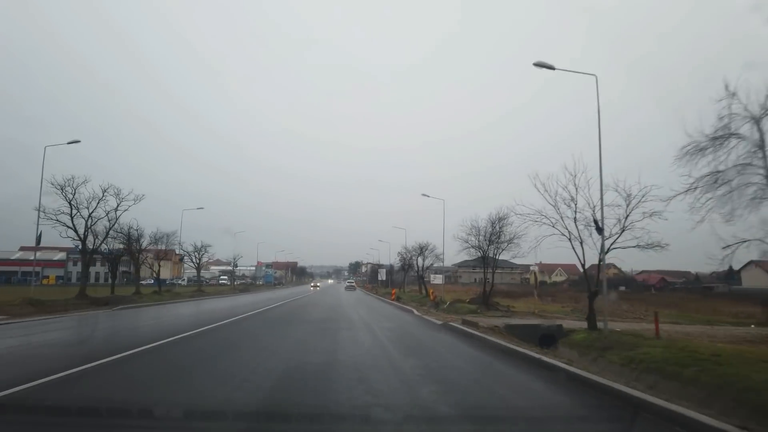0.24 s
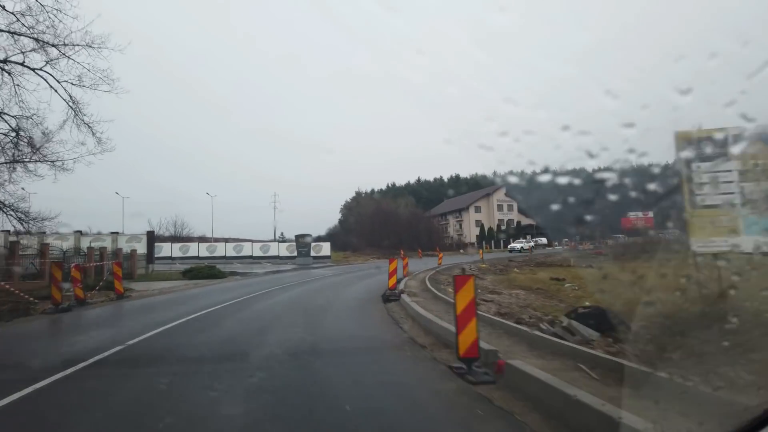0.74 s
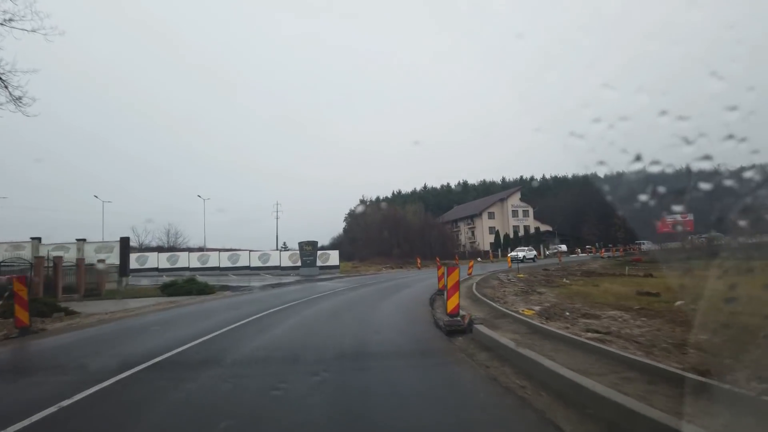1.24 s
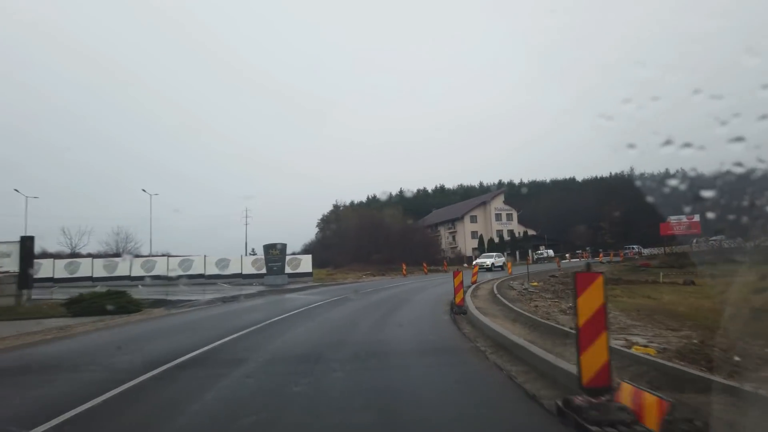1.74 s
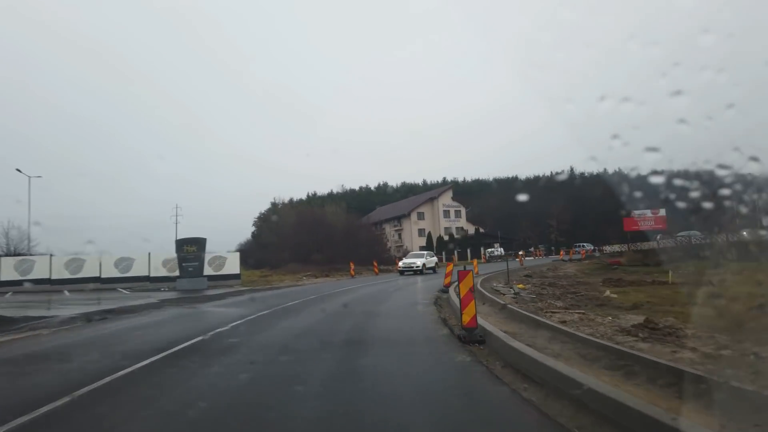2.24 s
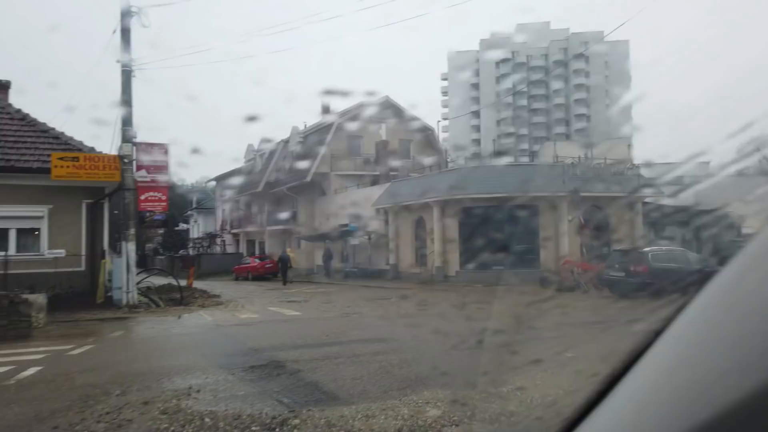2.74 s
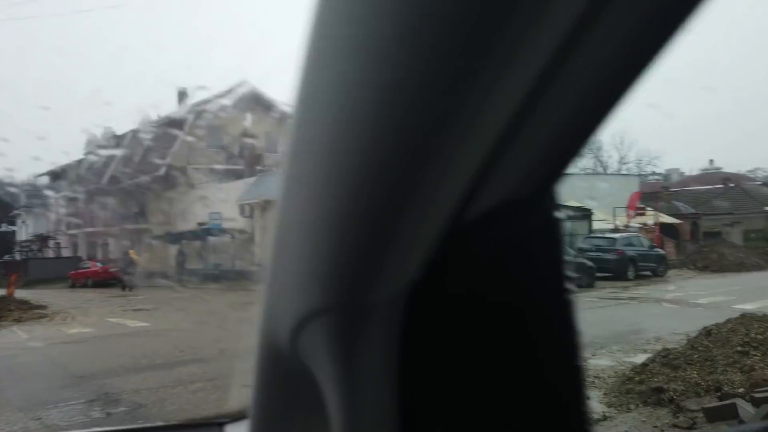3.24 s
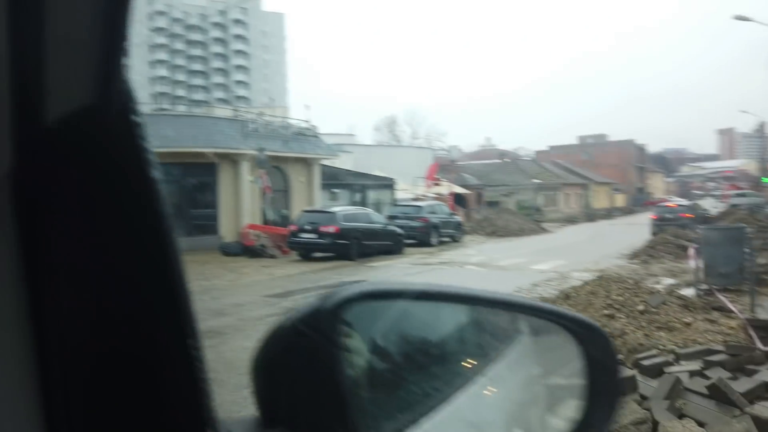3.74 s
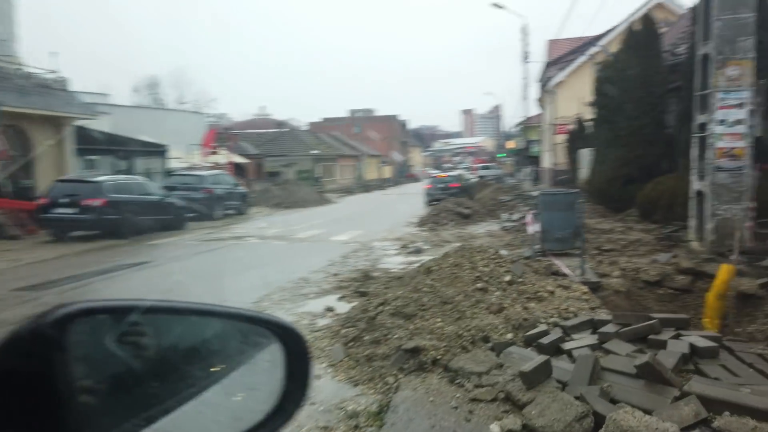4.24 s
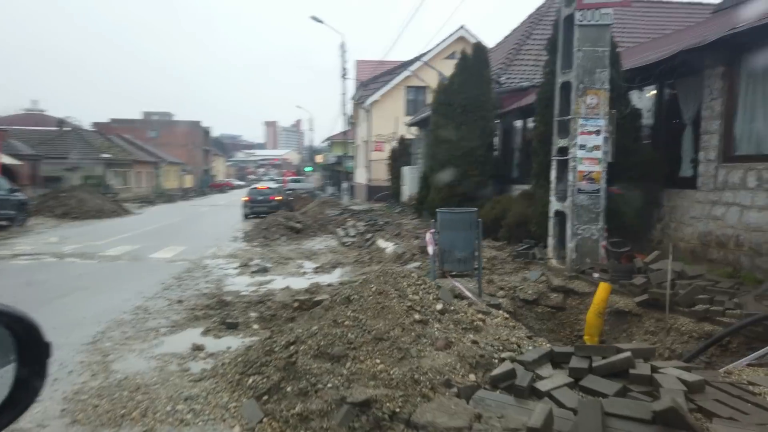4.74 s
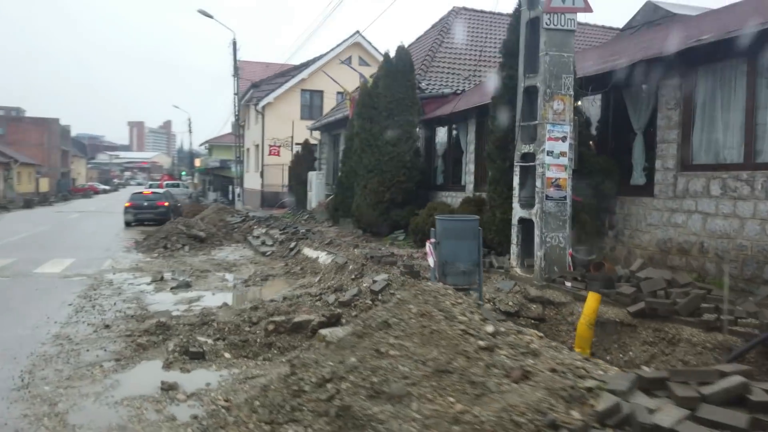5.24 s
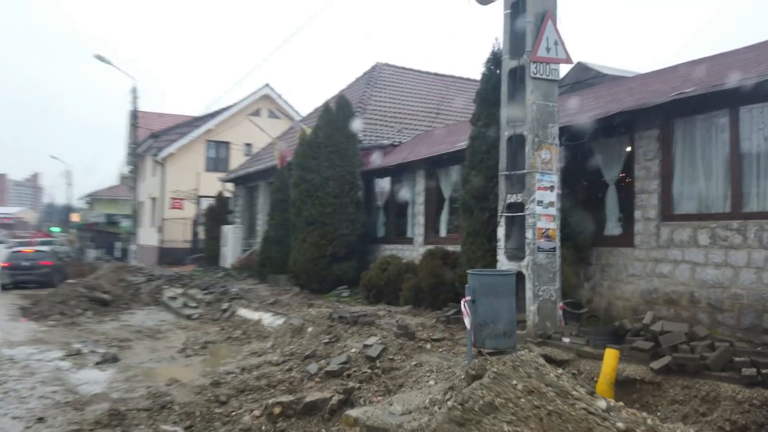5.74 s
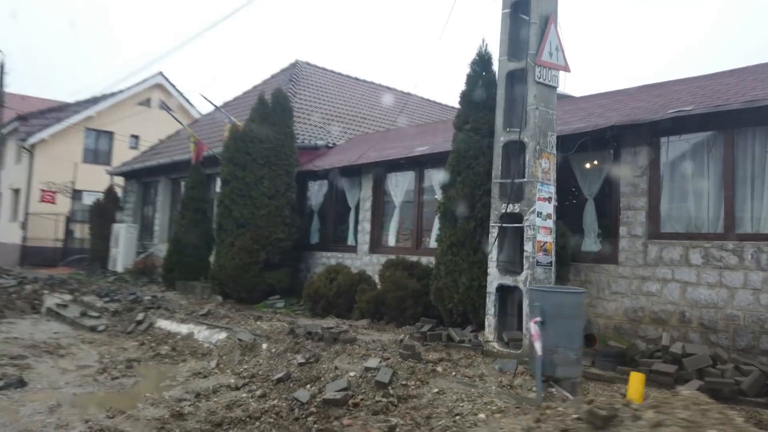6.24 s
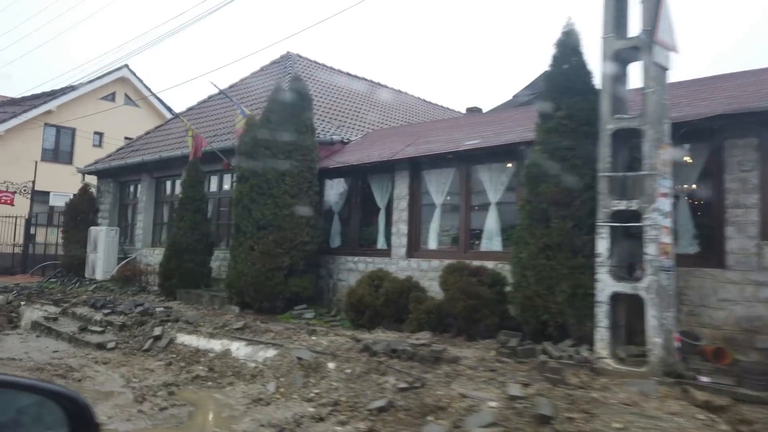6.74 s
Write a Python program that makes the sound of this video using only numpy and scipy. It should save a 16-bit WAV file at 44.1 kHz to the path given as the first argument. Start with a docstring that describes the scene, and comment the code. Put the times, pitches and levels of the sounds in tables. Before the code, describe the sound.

Close stereo microphones sit inside a car on a wet road; bass dominates. From 0 to 0.4 s the car runs fast: a deep steady engine tone, booming cabin air, tyre roar and soft spray, with a couple of faint ticks. A click at 0.38 s marks an abrupt cut to slower, softer rolling with a faint wavering tyre hum; a small metal buckle jingles near 1.15 s, followed by a light thud at 1.3 s. At 2.8 s another cut drops the engine near idle. The car crawls over broken ground, swelling with low jolts at 3.1, 4.1, 4.4 and 5.4 s. Cloth rustles, trim ticks cluster from 3.2 s, and a tiny gritty squeak slides around 4.1-4.3 s. A low thump comes at 5.15 s, a bright hard clack at 5.39 s, then the heaviest thuds at 5.6-5.8 s. The engine fades under subdued rumble, with last ticks near 6.5 s, until 7 s.

```python
"""The bass of a car's cabin on a wet road leads: engine firing tone, body bounce, air boom and floor drumming.
Three stretches follow abruptly: fast, slowing, then crawling over broken ground. The bass is sines and
shaped noise; thuds are decaying panel modes; tyre roar, spray and rubbing cloth are coloured noise.
Tyre air sings in two narrow tones; trim ticks, a buckle and a clack are struck resonances filled with
grainy noise; a squeak slides. All is heard at two close microphone ports."""
import sys
import numpy as np
from scipy import signal
from scipy.fft import rfft, irfft, next_fast_len
from scipy.io import wavfile
from scipy.ndimage import uniform_filter1d, map_coordinates

SR = 44100
rng = np.random.default_rng(int(sys.argv[2]) if len(sys.argv) > 2 else 0)


def inscribe(sig):
    """Save sig as 16-bit PCM at rate SR to the path in sys.argv[1].

    A 1-D sig is mono; a 2-D sig holds one channel per row.
    Samples are clipped to [-1, 1] before scaling.
    """
    pcm = np.round(np.clip(np.atleast_2d(sig).T, -1, 1) * 32767)
    wavfile.write(sys.argv[1], SR, pcm.astype(np.int16))


N = 308700

# Joins between the three stretches of the drive: time [s]
SPLICE_S = [.3818, 2.815]
# Excitation by the road: (time [s], tyre roar [dB], spray [dB], floor pan drumming [dB])
ROAD = [(0.0, -38, -48.5, -42), (0.19, -34.5, -50, -31), (0.375, -38, -50, -32), (0.39, -42.5, -55, -35),
        (1.0, -41.5, -55, -37), (1.74, -40.5, -54.5, -38), (2.3, -41.5, -55.5, -36),
        (2.81, -39, -54.5, -44), (2.82, -45.5, -56.5, -36.5), (3.03, -44.5, -55.5, -38.5),
        (3.12, -47, -57, -44.5), (3.76, -47, -58, -41), (4.03, -46, -56.5, -42),
        (4.42, -44.5, -51.5, -38.5), (4.85, -48, -57, -40), (5.5, -46, -57.5, -36.5), (5.8, -38, -57, -42),
        (5.97, -44.5, -55.5, -40.5), (6.21, -49.5, -60, -38), (6.55, -44, -57.5, -35),
        (7.0, -45.5, -57, -41)]
# Likeness of the two ports for local sources: (frequency [Hz], coherence [-1 to 1])
PORT_LIKENESS = [(30, 1), (80, 1), (150, 1), (300, 0.93), (450, 1), (700, 0.91), (1200, 0.92), (2500, 0.29),
                 (6000, 0.88), (14000, 0.56)]


def engine():
    """Periodic firing gives a near-sinusoidal tone; rocking on the mounts adds to its amplitude at bumps."""
    # In gear, then near idle: (time [s], firing frequency [Hz], level [dB])
    firing = [(0, 47.3, -21), (.375, 48.5, -15), (.39, 43.84, -27), (1.28, 42.8, -23.5), (1.36, 43, -31),
              (2.13, 41.34, -21), (2.5, 41.2, -29), (2.81, 42.18, -21.5), (2.82, 29.56, -33.5),
              (4.8, 28.19, -31), (5.5, 30.08, -27.5), (5.85, 33.7, -26), (6.46, 30.57, -42),
              (6.64, 28.5, -46), (7.0, 29.3, -52)]
    hz, db = curves(firing)
    rocking = bumps()[2]
    return tone(hz, amp(db) + rocking, waver_hz=0.446)


def body_bounce():
    """The sprung body oscillates at its low resonance, and bumps add amplitude."""
    hz, db = stretches()[:2]
    bounce = bumps()[0]
    return tone(hz, amp(db + 2.2 * wobble(0.67)) + bounce, waver_hz=1.186)


def cabin_boom():
    """The enclosed cabin air resonates as narrow-band bass noise, driven harder at bumps."""
    # Boom spectrum: (frequency [Hz], relative level [dB per Hz])
    boom_spectrum = [(8, -29.5), (13, -4.5), (28, -3), (36, 5), (52, 0.5), (62, -40.5)]
    steady_db, boom = stretches()[2], bumps()[1]
    return (amp(steady_db) + boom) * drone(boom_spectrum)


def floor_pan():
    """Broadband road forcing drums the floor plate in two resonant bands and a narrow hum."""
    # Low drum spectrum: (frequency [Hz], relative level [dB per Hz])
    drum_low = [(45, -28), (56, -9), (72, -8), (85, -29)]
    # High drum spectrum: (frequency [Hz], relative level [dB per Hz])
    drum_high = [(44, -29), (75, -1), (87, 1), (102, -4), (121, 1), (150, -9.5), (200, -37), (330, -120)]
    # Narrow hum spectrum: (frequency [Hz], relative level [dB per Hz])
    hum_spectrum = [(70, -49.5), (84, -6.5), (92, -5), (102, 0), (112, -13.5), (140, -60)]
    # Hum strength before its random wobble: (time [s], level [dB])
    hum_level = [(0, -61), (.45, -33.5), (1.3, -39.5), (2.3, -41), (3.0, -36), (3.7, -35), (4.0, -47),
                 (4.3, -38.5), (4.7, -48), (7, -41)]
    low = amp(-5) * drone(drum_low)
    high = amp(1.2 * wobble(5)) * drone(drum_high)
    hum = amp(curves(hum_level)[0] + 1.7 * wobble(3.2)) * drone(hum_spectrum)
    return amp(curves(ROAD)[2]) * (low + high) + hum


def thuds():
    """A soft blow excites by modal coupling: modes nearest its push ring most, then decay exponentially."""
    # Suspension blows: (time [s], level before mode weights [dB], strongest push [Hz],
    # loss an octave away [dB], share of the free ring time [1])
    thud_rows = [(1.308, -12.5, 93, 25.5, 0.65), (4.039, -30, 715, 3, 0.85), (4.404, -28.5, 403, 1.5, 1.04),
                 (4.814, -32.5, 442, 42, 0.8), (5.154, -12, 50.5, 14, 1.6), (5.168, -22, 138.2, 20, 1.63),
                 (5.6168, -15, 85, 10, 0.97), (5.6424, -13.5, 92.5, 12, 0.48),
                 (5.6974, -5, 144, 13.5, 0.31), (5.7058, -7, 187, 11.5, 0.28),
                 (5.727, -18.5, 330, 13.5, 0.79), (5.7364, -11.5, 130, 9, 0.17),
                 (5.783, -17, 432.8, 36, 0.75), (5.79, -24, 441, 31, 0.28)]
    # Floor and panel modes: (frequency [Hz], relative level [dB], free t60 [s])
    pan_modes = [(45.4, -2, 1), (86.9, 4.5, 0.28), (107.6, -6, 0.55), (160.3, 2.5, 0.12),
                 (244.7, 0.5, 0.13), (311, -13, 0.045), (429, -3, 0.079), (696, -6.5, 0.12),
                 (940, -13, 0.056)]
    sag, sag_s = 0.051, 0.015  # a struck panel starts sharp by this share and settles
    out, t = np.zeros((2, N + SR)), np.arange(SR // 2) / SR
    advance = sag * sag_s * (1 - np.exp(-t / sag_s))
    heard = t + advance - np.array([[1.3e-4], [0]])  # the left port hears it later
    fade = np.cos(np.pi * t) ** 2
    for s, db, push_hz, loss_db, lasts in thud_rows:
        for hz, mode_db, t60 in pan_modes:
            peak_db = db + mode_db - loss_db * abs(np.log2(hz / push_hz))
            decay = amp(peak_db - 60 * t / (lasts * t60))
            build = 1 - np.exp(-1.5 * hz * t)  # about one cycle
            out[:, round(s * SR):][:, :len(t)] -= decay * build * fade * np.sin(2 * np.pi * hz * heard)
    return out[:, :N]


def tyres():
    """Random tread and water impacts make broadband noise: roar through the floor, spray in the arches."""
    # Roar before the last stretch, with tyre cavity near 220 and 440 Hz:
    # (frequency [Hz], relative level [dB per Hz])
    roar_fast = [(82, -34), (140, -11.5), (157, 3), (189, -2.5), (226, 0.5), (269, -9.5), (307, -7.5),
                 (345, -13), (391, -13), (437, -9.5), (480, -11.5), (527, -23.5), (620, -34.5), (810, -64),
                 (1360, -120)]
    # Roar at a crawl: (frequency [Hz], relative level [dB per Hz])
    roar_slow = [(82, -47), (140, -5), (175, 1.5), (194, -4.5), (238, -4.5), (264, -7), (307, -4),
                 (339, -12), (471, -13), (505, -16.5), (620, -25.5), (810, -57), (1360, -120)]
    # Spray spectrum: (frequency [Hz], relative level [dB per Hz])
    spray_spectrum = [(340, -32.5), (580, -3.5), (696, -3), (857, -8.5), (963, -8), (1540, -14.5),
                      (1920, -12), (2270, -18.5), (3400, -24.5), (3780, -26), (5300, -32.5), (6780, -42.5),
                      (10200, -40.5), (13000, -64.5)]
    roar_db, spray_db = curves(ROAD)[:2]
    crawling = np.arange(N) / SR > SPLICE_S[1]
    slow = rush(roar_slow, patchy_db=1.0, lag_s=0.000054)
    fast = rush(roar_fast, patchy_db=1.5, lag_s=0.00011)
    spray = rush(spray_spectrum, patchy_db=1.18, lag_s=0.000067)
    texture = wobble(13)  # the road surface shakes both layers together
    roar = amp(roar_db + 0.51 * texture) * np.where(crawling, slow, fast)
    return roar + amp(spray_db + 0.16 * texture) * spray


def cavity():
    """Air resonance in the tyres gives two narrow, fluttering tones an octave apart."""
    # Tones before flutter: (time [s], frequency [Hz], level [dB], octave level [dB])
    cavity_tones = [(0, 226.1, -48.5, -51.5), (.375, 224.8, -46, -54), (.39, 217.5, -52.5, -69),
                    (1.1, 223, -54.5, -58), (1.6, 217.4, -49, -49.5), (1.92, 232.3, -53.5, -56.5),
                    (2.25, 211.6, -48.5, -61), (2.81, 220.6, -53, -55.5), (2.82, 221.6, -80, -78)]
    hz, low_db, high_db = curves(cavity_tones)

    def flutter(apart):
        return wobble(14) + apart * np.array([[1], [-1]]) * wobble(14)  # slightly unlike at the ports

    low = tone(hz, amp(low_db), waver_hz=3) * flutter(.08)
    return low + tone(2 * hz, amp(high_db), waver_hz=6) * flutter(.17)


def clothes():
    """Friction of cloth is modulated noise: strokes rise, hold and fall, and treble fizz follows them."""
    # Cloth spectrum: (frequency [Hz], relative level [dB per Hz])
    cloth_spectrum = [(1650, -20.5), (2800, -2.5), (3480, -5), (4180, -6.5), (4630, -6.5), (5620, -5),
                      (6470, -10.5), (7500, -11.5), (9750, -20.5), (16500, -120)]
    # Treble fizz spectrum: (frequency [Hz], relative level [dB per Hz])
    fizz_spectrum = [(4000, -26), (6800, -5), (8090, 0.5), (10200, 0.5), (12100, -5.5), (15100, -7),
                     (15600, -14.5)]
    # Strokes: (start time [s], length [s], cloth level [dB], fizz level [dB])
    strokes = [(2.762, 0.29, -64, -71), (2.94, 0.66, -68, -75.5), (3.467, 0.61, -67, -77),
               (3.811, 0.47, -66, -76), (4.194, 0.68, -59.5, -65.5), (4.709, 0.5, -68.5, -72.5),
               (5.074, 0.33, -66.5, -71.5), (5.3, 0.45, -72.5, -73.5), (5.831, 0.17, -88, -50),
               (5.953, 0.18, -55, -77.5), (6.443, 0.31, -71, -99), (6.615, 0.42, -84, -78),
               (6.803, .4, -73, -76)]
    rise_s, fall_s, patchy_db = 0.093, 0.21, 1.3
    t = np.arange(N) / SR
    ramp = lambda x: np.clip(x, 0, 1) ** 2
    gains = amp(stretches()[3:])
    for s, length, *dbs in strokes:
        stroke = ramp((t - s) / rise_s) * ramp((s + length - t) / fall_s)
        gains = gains + amp(dbs)[:, None] * stroke
    cloth, fizz = gains
    grip = wobble(25)
    rubbing = cloth * amp(1.2 * grip) * rush(cloth_spectrum, patchy_db, lag_s=0.00014)
    return rubbing + fizz * amp(1.0 * grip) * rush(fizz_spectrum, patchy_db, lag_s=.6e-4)


def ticks():
    """Brief trim contacts excite damped resonances: a knock, a snap and a sizzle that dies first."""
    # Contacts, each on another panel: (time [s], knock level [dB], knock frequency [Hz],
    # snap level [dB], snap frequency [Hz], sizzle level [dB], base t60 [s])
    tick_rows = [(0.0891, -50, 1000, -52, 2600, -54, 0.1), (.272, -69, 1020, -49.5, 3290, -63.5, 0.13),
                 (0.2846, -68, 1020, -54, 3150, -55, 0.09), (1.2312, -53.5, 948, -54, 2460, -62, 0.15),
                 (1.322, -71, 960, -58, 3260, -72, 0.1), (3.183, -64, 1306, -51.5, 2100, -69, 0.089),
                 (3.197, -55, 855, -50.5, 2740, -55, 0.061), (3.224, -65, 1003, -57, 3400, -65.5, 0.046),
                 (3.238, -52.5, 1310, -55, 3200, -79, 0.22), (3.26, -48.5, 1350, -50.5, 1980, -55, 0.04),
                 (3.282, -45.5, 1430, -64, 2190, -73, 0.06), (3.293, -49.5, 1380, -62, 2190, -72, 0.077),
                 (3.305, -50, 1402, -58, 2926, -70.5, 0.0695), (3.686, -62, 932, -55, 2990, -62, 0.094),
                 (3.803, -64, 949, -52.5, 2800, -55, 0.053), (4.007, -51.5, 930, -52.5, 3480, -72.5, 0.12),
                 (4.0405, -39, 1060, -45, 1590, -67, 0.025), (4.049, -43, 1320, -48, 1640, -72, 0.071),
                 (4.207, -46.5, 1002, -58, 3340, -60, 0.064), (4.3305, -55, 1168, -40.5, 3400, -72, 0.042),
                 (4.344, -54, 1170, -49.5, 3200, -66, 0.072), (4.394, -38, 1150, -49, 2142, -64.5, 0.043),
                 (4.409, -33, 1330, -44, 2150, -71, 0.039), (4.4085, -60, 1100, -47, 3000, -59, 0.025),
                 (4.419, -48, 1100, -51, 3320, -69, 0.045), (4.449, -45.5, 1460, -67.5, 2220, -79, 0.06),
                 (4.555, -36, 850, -45.5, 2362, -40, 0.047), (4.822, -54.5, 888, -55.5, 2190, -62, 0.16),
                 (4.9084, -54, 920, -46, 2280, -85, 0.06), (5.1482, -50.5, 910, -55, 2110, -71, 0.21),
                 (5.3178, -71, 954, -51, 2860, -44, 0.082), (5.394, -53, 1157, -55, 3300, -45, 0.052),
                 (5.429, -42.5, 860, -45.5, 2700, -58, 0.091), (5.4506, -52, 900, -48, 2140, -54, 0.092),
                 (5.5105, -49.5, 884, -47, 2220, -59, 0.074), (5.611, -53.5, 888, -62, 2000, -82, 0.14),
                 (5.7015, -42, 950, -78, 2237, -83, 0.067), (5.782, -42, 980, -44, 1746, -75, 0.14),
                 (5.8412, -42, 1400, -57, 3480, -76, 0.062), (5.907, -43.5, 935, -44, 1650, -63, 0.055),
                 (5.924, -51.5, 876, -48.5, 1600, -66.5, 0.058),
                 (5.9935, -44.5, 1201, -46, 1730, -59, 0.049), (6.5105, -45, 1090, -57, 2640, -78.5, 0.11),
                 (6.549, -44, 960, -49.5, 3400, -78, 0.051), (6.554, -44.5, 874, -49, 2260, -80, 0.068)]
    # Sizzle resonances: (frequency [Hz], width [Hz], relative level [dB])
    sizzle_modes = [(5220, 500, 8), (8000, 1100, 2), (10200, 2500, 3), (13200, 3000, -6)]
    # ticks above hard_db are hard blows; soft_span_db below it they ring least
    hard_db, soft_span_db = -42, 13
    out = np.zeros((2, N + SR))
    for s, knock_db, knock_hz, snap_db, snap_hz, sizzle_db, t60 in tick_rows:
        soft = np.clip((hard_db - max(knock_db, snap_db)) / soft_span_db, 0, 1)
        slow, ring = 1 + 1.8 * soft, 1.1 - 0.7 * soft  # weak contacts start slower and ring less
        touch = s - .0012 * slow  # contact begins just before the peak
        knock_modes = [(knock_hz, 0.19 * knock_hz, 0), (1.57 * knock_hz, 0.083 * knock_hz, -9)]
        snap_modes = [(0.68 * snap_hz, 0.59 * snap_hz, -12), (snap_hz, 0.24 * snap_hz, 0),
                      (3.3 * snap_hz, 0.39 * snap_hz, -19)]
        strike(out, touch, knock_db, knock_modes, 1.26 * t60, rise_s=0.0013 * slow, ring=ring)
        strike(out, touch, snap_db, snap_modes, 1.51 * t60, rise_s=0.0009 * slow, ring=ring)
        strike(out, touch, sizzle_db, sizzle_modes, 0.71 * t60, rise_s=0.0022 * slow, ring=0.4)
    return out[:, :N]


def buckle():
    """A metal buckle jingles: repeated impacts excite its own inharmonic modes."""
    # Impacts: (time [s], level [dB], low-mode t60 [s])
    buckle_blows = [(1.147, -57, 0.2), (1.154, -46, 0.19), (1.1635, -32.5, 0.069), (1.178, -43, 0.13)]
    # Modes: (frequency [Hz], width before broadening [Hz], relative level [dB])
    buckle_modes = [(830, 11, -9), (1110, 27, -9), (1487, 38, -3.5), (1963, 86, -2.5), (2420, 26, -5.5),
                    (2900, 29, -15), (3210, 28, -8), (4080, 18, -17.5), (5070, 97, -20), (6560, 76, -13),
                    (8300, 51, -19), (10170, 160, -15.5), (11600, 35, -22.5), (12600, 84, -25.5)]
    return hard_impacts(buckle_blows, buckle_modes, blur_hz=55)


def clack():
    """A hard part snaps home and settles, every impact exciting the same modes of the part."""
    # Impacts: (time [s], level [dB], low-mode t60 [s])
    clack_blows = [(5.372, -54.5, 0.46), (5.383, -52, 0.25), (5.3925, -26, 0.088), (5.468, -50, 0.033),
                   (5.585, -61, 0.081), (5.905, -58.5, 0.1)]
    # Modes: (frequency [Hz], width before broadening [Hz], relative level [dB])
    clack_modes = [(1286, 54, -1), (1730, 7.7, -3.5), (2103, 65, -6.5), (3270, 60, -6.5), (3560, 36, -18),
                   (4100, 27, -16.5), (4680, 37, -15.5), (5030, 41, -16), (5780, 83, -15.5),
                   (7750, 180, -22), (8900, 85, -34), (10220, 63, -22.5), (11600, 35, -35)]
    return hard_impacts(clack_blows, clack_modes, blur_hz=20)


def squeak():
    """Stick-slip friction of two trim panels: a gritty, broken tone and a weak overtone slide."""
    # Sliding tone, silent at or below -74 dB: (time [s], frequency [Hz], level before grit [dB])
    slide = [(4.06, 1206, -77), (4.075, 1165, -60), (4.1, 1003, -59), (4.128, 1031, -64), (4.14, 1038, -52),
             (4.155, 1010, -54), (4.17, 975, -58), (4.2, 953, -65), (4.235, 1087, -62), (4.29, 1094, -66),
             (4.31, 1095, -75)]
    hz, db = curves(slide)

    def slips():
        return amp(db + 1.4 * wobble(55)) * (db > -74) * (1 + 0.46 * wobble(300))

    return tone(hz, slips(), waver_hz=0) + tone(1.3 * hz, amp(-12.5) * slips(), waver_hz=0)


def splice_click():
    """A pressure step at the first join clicks, with an exponential slope on either side."""
    t = np.arange(N) / SR - SPLICE_S[0]
    return -amp(-26) * np.sign(t) * np.exp(-np.abs(t) / 0.0052)


def stretches():
    """Piecewise-steady levels: each column as one value per sample, with short fades at the joins."""
    # Each stretch between bumps and strokes: (bounce frequency [Hz], bounce level [dB],
    # boom level [dB], cloth level [dB], fizz level [dB])
    steady = [(21.17, -35.5, -32, -71.5, -87.5), (21.2, -29.5, -40.5, -76, -89),
              (18.65, -31, -34.5, -76.5, -80)]
    steps = np.array(steady)[np.searchsorted(SPLICE_S, np.arange(N) / SR)].T
    return uniform_filter1d(steps, size=400, axis=1)


def bumps():
    """Transient road forcing swells and fades as a Gaussian; one gain curve per shaken part."""
    # Bumps: (time [s], half length to 1/e [s], body bounce [dB], cabin boom [dB], engine rocking [dB])
    bump_rows = [(0.216, 0.16, -27, -29, -67), (0.357, 0.022, -19, -43, -58.5), (0.65, 0.14, -27, -33, -53),
                 (1.047, 0.12, -23, -45, -58), (1.458, 0.018, -49, -42, -58), (1.714, 0.081, -33, -45, -42),
                 (2.394, 0.14, -32, -44.5, -63.5), (2.835, 0.045, -25.5, -41, -38.5),
                 (3.016, 0.062, -17, -25, -37), (3.131, 0.068, -15.5, -25, -26),
                 (3.755, 0.19, -35, -36, -40), (4.098, 0.065, -22.5, -24.5, -27.5),
                 (4.387, 0.063, -16.5, -34, -31), (4.767, 0.14, -21, -26.5, -23),
                 (5.205, 0.16, -60, -57, -48), (5.428, 0.094, -16.5, -37, -24.5),
                 (5.931, 0.067, -28, -19.5, -38.5), (6.28, 0.026, -61, -46, -57),
                 (6.67, 0.066, -50, -35, -45), (6.865, 0.037, -38, -25.5, -32.5)]
    t = np.arange(N) / SR
    return sum(amp(dbs)[:, None] * np.exp(-((t - s) / half_s) ** 2) for s, half_s, *dbs in bump_rows)


def hard_impacts(blows, modes, blur_hz):
    """Modal damping broadens each resonance; modes from 4 kHz up start earlier and die sooner."""
    out = np.zeros((2, N + SR))
    blurred = [(hz, width + blur_hz + 0.042 * hz, db) for hz, width, db in modes]
    low = [m for m in blurred if m[0] < 4000]
    treble = [m for m in blurred if m[0] >= 4000]
    for s, db, t60 in blows:
        strike(out, s, db, low, t60, rise_s=0.0024, ring=0.71)
        strike(out, s - .002, db - 5.5, treble, 0.8 * t60, rise_s=0.0019, ring=0.55)
    return out[:, :N]


def strike(out, s, db, modes, t60, rise_s, ring):
    """Impulse response of damped modes, filled by a grainy noise scrape drawn out by the cabin over t60."""
    t = np.arange(SR // 4) / SR

    def resonances(f):
        return sum((-1) ** k * amp(g) * 1j * f * w / (c * c - f * f + 1j * f * w)
                   for k, (c, w, g) in enumerate(modes))

    def soft_contact(f):
        return resonances(f) / (1 + (f / (1.8 * modes[-1][0])) ** 4)  # little above the top mode

    lag_s = 1e-4 * rng.standard_normal()  # each part sits in another direction
    grains = np.interp(t * 900, np.arange(400), rng.standard_normal(400))  # 900 uneven grains a second
    noise = amp(3 * grains) * rng.standard_normal((2, len(t)))
    shape = amp(-60 * t / t60) * (1 - np.exp(-t / rise_s)) ** 2
    scrape = shape * ports(noise, soft_contact, lag_s, PORT_LIKENESS)
    scrape = scrape * np.sqrt(np.mean(shape ** 2) / np.mean(scrape ** 2))
    hz, width_hz, mode_db = np.transpose(modes)[:, :, None, None]
    heard = t + lag_s * np.array([[-.5], [.5]])
    sines = np.sin(2 * np.pi * (hz * heard + rng.random(hz.shape)))
    blow = np.sum(amp(mode_db - mode_db.max()) * np.exp(-.3 * width_hz * t) * sines, axis=0)
    out[:, round(s * SR):][:, :len(t)] += amp(db) * (scrape + ring * shape * blow)


def rush(spectrum, patchy_db, lag_s):
    """Diffuse-field noise of rms 1, with patches of random gain in time and frequency."""
    # Likeness of the ports for noise from all round: (frequency [Hz], coherence [-1 to 1])
    diffuse = [(60, 0.87), (120, 1.0), (240, 1), (480, 0.98), (950, 0.97), (1890, 0.71), (3770, -0.06),
               (7520, 0.05), (15000, 0.12)]
    z = signal.stft(rng.standard_normal((2, N)), nperseg=512)[2]
    field = uniform_filter1d(rng.standard_normal(z.shape[1:]), size=6, axis=0)
    field = uniform_filter1d(field, size=10, axis=1)
    pair = signal.istft(z * amp(patchy_db * unit(field)), nperseg=512)[1][:, :N]
    return unit(ports(pair, lambda hz: amp(along(spectrum, hz)), lag_s, diffuse))


def drone(spectrum):
    """Spectrally shaped random bass of rms 1."""
    closed = spectrum + [(400, -120)]
    gain = lambda hz: amp(along(closed, hz)) * (hz > 8)
    return unit(ports(rng.standard_normal((2, N)), gain, .7e-4, PORT_LIKENESS))


def tone(hz, gain, waver_hz):
    """Phase is the integral of frequency: a slightly unsteady sine of rms gain."""
    cycles = rng.random() + np.cumsum(hz + waver_hz * wobble(3)) / SR
    return np.sqrt(2) * gain * np.sin(2 * np.pi * cycles)


def ports(pair, gain, lag_s, alike):
    """Interchannel coherence: two unrelated signals mix to a likeness; the left port hears lag_s later."""
    turn = lambda hz: np.arccos(np.clip(along(alike, hz), -1, 1)) / 2
    mid, side = filtered(pair, lambda hz: gain(hz) * [np.cos(turn(hz)), np.sin(turn(hz))])
    delay = lambda hz: np.exp(-1j * np.pi * hz * lag_s * np.array([[1], [-1]]))
    return filtered(np.array([mid + side, mid - side]), delay)


def filtered(x, response):
    """Linear filtering: the spectrum of x times a complex response of frequency."""
    m = next_fast_len(x.shape[-1] + 8192)
    return irfft(rfft(x, m) * response(np.fft.rfftfreq(m, 1 / SR)), m)[..., :x.shape[-1]]


def wobble(rate):
    """Band-limited random modulation: a smooth curve with rate knots a second."""
    knots = rng.standard_normal(int(N * rate / SR) + 4)
    return map_coordinates(knots, [np.arange(N) * rate / SR])


def curves(rows):
    """Linear interpolation in time: one value per sample for each column after the time."""
    s, *cols = np.transpose(rows)
    return [np.interp(np.arange(N) / SR, s, c) for c in cols]


def along(points, hz):
    """Interpolation of (frequency [Hz], value) points on a logarithmic frequency axis."""
    f, v = np.transpose(points)
    return np.interp(np.log(hz + 1), np.log(f + 1), v)


def amp(db):
    """Decibel level to amplitude ratio."""
    return 10 ** (np.asarray(db) / 20)


def unit(x):
    """Normalisation of signal power to rms 1."""
    return x / np.sqrt(np.mean(x ** 2) + 1e-20)


def scene():
    """Linear superposition of all sources at the two ports."""
    bass = engine() + body_bounce() + cabin_boom() + floor_pan()
    road = thuds() + tyres() + cavity()
    small_parts = clothes() + ticks() + buckle() + clack() + squeak()
    return bass + road + small_parts + splice_click()


def record(dry):
    """Band limiting: the microphones pass nothing from 15760 Hz up."""
    return filtered(dry, lambda hz: hz < 15760)


dry = scene()
out = record(dry)
inscribe(out)
```